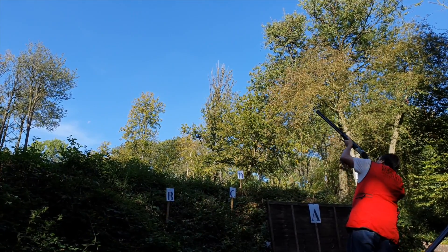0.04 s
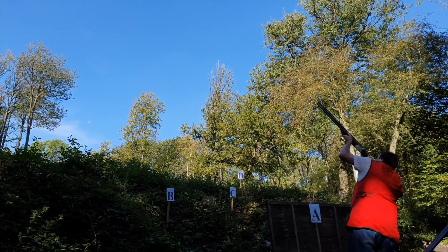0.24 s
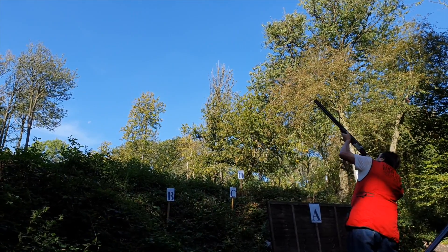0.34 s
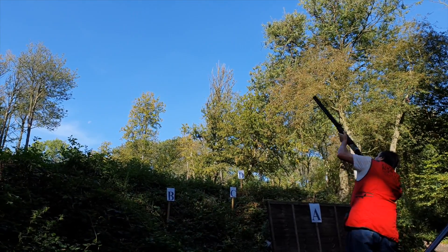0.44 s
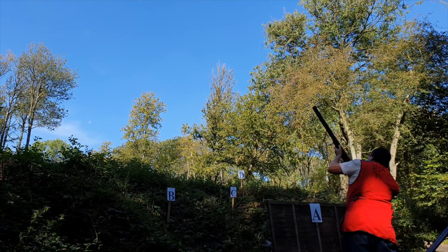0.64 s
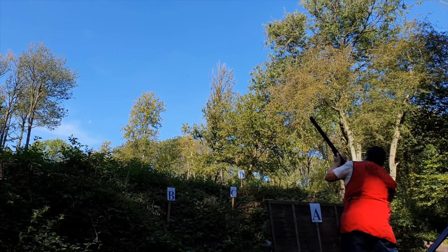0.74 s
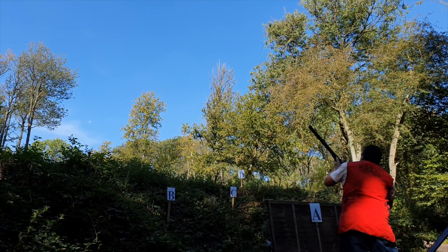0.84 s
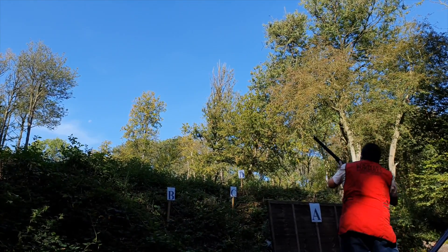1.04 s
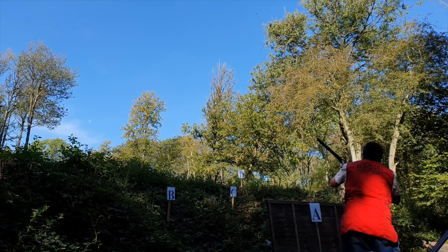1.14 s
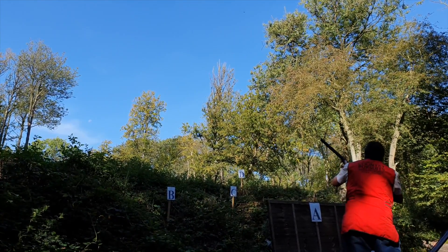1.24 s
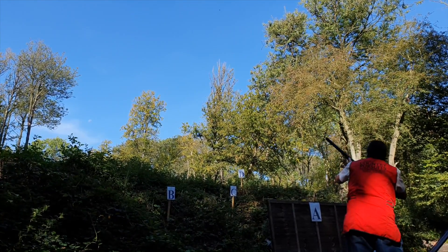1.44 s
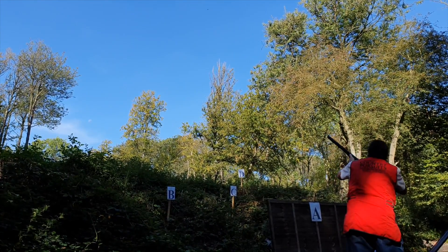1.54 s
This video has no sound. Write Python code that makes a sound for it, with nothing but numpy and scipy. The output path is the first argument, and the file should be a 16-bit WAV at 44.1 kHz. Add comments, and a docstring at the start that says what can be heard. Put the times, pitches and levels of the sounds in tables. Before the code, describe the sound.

A single shotgun blast cracks close by and rolls away through the surrounding woods.

```python
"""First comes a low outdoor rumble and a small click, then one shotgun shot from a few metres ahead.
Gas from the muzzle makes a short, harsh crack, and its pressure wave bounces off the ground.
A bank and near trees around the shooting ground throw it back as a bright swell of echoes.
The far woods ring on, growing darker and rolling from left to right, with a faint rustle in the tail."""
import sys
import numpy as np
from scipy import signal
from scipy.fft import rfft, irfft
from scipy.io import wavfile

SR = 44100
rng = np.random.default_rng(int(sys.argv[2]) if len(sys.argv) > 2 else 0)


def put_to_file(sound):
    """Save the sound as 16-bit audio at rate SR, in the file named by the first command-line argument."""
    columns = np.atleast_2d(sound).T  # one column per channel
    safe = np.clip(columns, -1, 1)
    whole_steps = np.round(safe * 32767)
    wavfile.write(sys.argv[1], SR, whole_steps.astype(np.int16))


N = 70560  # 1.6 seconds
SHOT_S = .2343


def undb(db):
    """Turn decibels into a number to multiply by."""
    return 10 ** (np.asarray(db) / 20)


def rms(x):
    """The average strength of a sound."""
    return np.sqrt(np.mean(x ** 2))


def unit(x):
    return x / rms(x)


def clock():
    return np.arange(N) / SR


def freqs():
    return np.arange(N + 1) * SR / (2 * N)


def at(hz, table, column=1):
    """Look up a table between its rows, on a log-frequency scale."""
    table = np.array(table)
    return np.interp(np.log(hz + 1), np.log(table[:, 0]), table[:, column])


def loudness(table):
    """A volume curve through (time [s], level [dB]) points."""
    return undb(np.interp(clock(), *np.array(table).T))


def bump(centre, width):
    """A smooth rise and fall."""
    return np.exp(-((clock() - centre) / width) ** 2 / 2)


def burst(start, hold, fall):
    """Jump to full strength, hold, then die away."""
    age = clock() - start
    return (age >= 0) * np.exp(-np.maximum(age - hold, 0) / fall)


def fade(age, fade_s):
    """Drop by 60 dB every fade_s seconds."""
    return np.exp(-np.log(1000) * age / fade_s)


def colour(x, table):
    """Shape the tone with (frequency [Hz], gain [dB]) points."""
    cepstrum = irfft(np.log(undb(at(freqs(), table))))
    cepstrum[1:N] *= 2  # folded so the filter rings only after a sound, never before
    cepstrum[N + 1:] = 0
    return irfft(rfft(x, 2 * N) * np.exp(rfft(cepstrum)))[..., :N]


def balance(x, table):
    """Tilt the two sides apart in tone by (frequency [Hz], left minus right [dB]) points."""
    return np.array([colour(side, np.array(table) * [1, half]) for side, half in zip(x, (.5, -.5))])


def arrive(x, lag_ms):
    """A wave reaches the left microphone lag_ms after the right; below zero, the left comes first."""
    delay_s = np.array([[lag_ms], [-lag_ms]]) / 2000
    return irfft(rfft(x, 2 * N) * np.exp(-2j * np.pi * freqs() * delay_s))[:, :N]


def grains(scatter_db=1.5):
    """Noise like a crowd of tiny echoes of uneven size."""
    sizes_db = scatter_db * np.repeat(rng.standard_normal(N // 16 + 1), 16)[:N]
    return unit(rng.standard_normal(N) * undb(sizes_db))


def surround(tone, lag_ms=0, focus=0, mic_gap_ms=.48, bass_likeness=.94):
    """Noise from all around, alike on both sides in the bass; the focus share comes from one direction."""
    hz, angles = freqs()[::100], np.linspace(0, np.pi, 64)
    alike = np.cos(2 * np.pi * np.outer(hz, np.cos(angles)) * mic_gap_ms / 1000).mean(1)
    alike = np.interp(freqs(), hz, alike) * bass_likeness
    mid = grains()
    side = irfft(rfft(grains(), 2 * N) * np.sqrt((1 - alike) / (1 + alike)))[:N]
    around = np.array([mid + side, mid - side]) / np.sqrt(2)
    aimed = arrive(grains(), lag_ms)
    return unit(colour(np.sqrt(1 - focus) * around + np.sqrt(focus) * aimed, tone))


# Tone of the rumble (frequency [Hz], relative level [dB])
RUMBLE_TONE = [(20, -24), (40, -7.5), (75, 1), (140, -11.5), (220, -10), (350, -17.5), (600, -16),
               (1000, -24.5), (1500, -31.5), (2400, -42), (4000, -44.5), (6000, -41), (7000, -51.5),
               (10000, -52), (12000, -62), (16000, -66)]
# How loud the rumble is (time [s], level [dB])
RUMBLE_LEVEL = [(0, -45), (.22, -47.5), (.3, -53.5), (.8, -61.5), (1.3, -65.5), (1.6, -63)]

def rumble():
    """Low outdoor rumble, much quieter after the shot."""
    return surround(RUMBLE_TONE) * loudness(RUMBLE_LEVEL)


# Tone of the click (frequency [Hz], relative level [dB])
CLICK_TONE = [(200, -13), (900, -4.5), (1500, 5.5), (2600, -14), (7000, -18), (12000, -13), (16000, -18)]
# Notes of its knock (frequency [Hz], peak level [dB], time to fade 60 dB [s])
KNOCK_NOTES = [(1260, -44.5, .025), (1690, -45.5, 0.02)]

def click(start_s=.154):
    """A tick of noise and two briefly ringing notes, just before the shot."""
    age = np.maximum(clock() - start_s, 0)
    knock = sum(undb(db) * np.sin(2 * np.pi * hz * age) * fade(age, fade_s)
                for hz, db, fade_s in KNOCK_NOTES)
    tick = surround(CLICK_TONE) * burst(start_s, hold=0, fall=.0022) * undb(-47)
    return knock + tick


# Tone of the crack (frequency [Hz], relative level [dB])
CRACK_TONE = [(60, -19.5), (200, -6.5), (290, 4.5), (430, -12), (660, -1.5), (950, -6.5), (1500, -8.5),
              (2200, -16.5), (3300, -11), (4000, -3.5), (4900, 0.5), (5800, -8), (7000, -19), (8500, -9.5),
              (11000, -23), (16000, -22)]
# Which way the crack leans (frequency [Hz], left minus right [dB])
CRACK_LEAN = [(100, 4), (700, 6.5), (2500, 3.5), (4800, 6.5), (7000, 0), (9000, -1.5), (16000, -1)]

def muzzle_crack():
    """Gas leaves the muzzle in a few milliseconds of harsh noise, with an edge near 5 kHz on the left."""
    gas = arrive(rng.standard_normal(N), lag_ms=.093)
    gas += .6 * rng.standard_normal((2, N))  # separate noise on each side widens the sound
    shape = burst(SHOT_S, hold=.0017, fall=.003)
    crack = colour(balance(gas * shape, CRACK_LEAN), CRACK_TONE)
    return unit(crack) * rms(shape) * undb(-11)


# The muzzle's wave, its ground bounce, then slaps off the bank and trunks
# (time [s], level before tone shaping [dB], push length [ms], left lag [ms], left minus right [dB])
SHOCKS = [(.2352, -11.5, .5, 0.1, 7), (.2382, -2, .7, .05, 5), (.2760, -17.5, .6, -0.17, -2.5),
          (.2790, -19.5, .6, -.2, 0), (.2955, -11.5, 0.44, -.2, -1.5), (.3030, -12.5, .3, -.23, -1),
          (.3075, -11, 0.4, -0.34, 0), (.3105, -11, 0.36, -.23, -1)]
# Tone of these waves (frequency [Hz], gain [dB])
SHOCK_TONE = [(40, -21.5), (120, -13.5), (280, 0.5), (480, -6), (720, 5.5), (1150, 0), (1700, 1),
              (2400, -5.5), (5000, -11), (16000, -15.5)]

def shock_waves(puff_s=.257, puff_hz=72.2):
    """Each wave pushes the air, then sucks it back; a slow, deep puff of air follows the shot."""
    waves = 0
    for start, db, push_ms, lag_ms, lean_db in SHOCKS:
        age = np.maximum(clock() - start, 0) * 1000 / push_ms  # counted in push lengths
        wave = (age > 0) * (1 - age) * np.exp(-age)
        sides = undb([[lean_db / 2], [-lean_db / 2]])
        waves += arrive(wave, lag_ms) * undb(db) * sides
    puff = -np.sin(2 * np.pi * puff_hz * (clock() - puff_s)) * bump(puff_s, width=.0051)
    return colour(waves, SHOCK_TONE) + puff * undb(-25.5)


# Tone of the near echoes (frequency [Hz], relative level [dB])
NEAR_TONE = [(30, -32), (70, -11), (190, -11), (300, -7), (480, -8), (750, -6), (1200, -11), (1800, -6),
             (2300, -8), (3300, -8), (4100, -7.5), (5600, -8.5), (6900, -14), (8600, -13.5), (11000, -15.5),
             (13400, -19.5), (16000, -23)]
# How they swell and sink, before the closing fade (time [s], level [dB])
NEAR_SWELL = [(.236, -33), (.246, -25), (.258, -19.5), (.268, -19.5), (.277, -15.5), (.291, -15.5),
              (.305, -15.5), (.315, -16), (.335, -22), (.38, -29.5), (.5, -84)]

def near_trees():
    """Bank, trunks and leaves throw the blast back as a bright swell."""
    echoes = surround(NEAR_TONE, lag_ms=-.23, focus=.16)
    return echoes * loudness(NEAR_SWELL) * burst(SHOT_S, hold=.25, fall=.03)


# Tone of the far echoes (frequency [Hz], relative level [dB])
WOODS_TONE = [(24, -50.5), (40, -22.5), (77, -11), (194, -15), (231, -9.5), (402, -8), (585, -3.5),
              (697, -8), (873, -6.5), (1340, -6), (1810, -6), (2150, -9), (3060, -7), (4240, -12),
              (6020, -10), (6820, -19.5), (13100, -25), (14800, -36), (16000, -51.5)]
# How they die away (frequency [Hz], early 60 dB fade [s], late 60 dB fade [s], late share [dB])
WOODS_FADES = [(60, 0.63, 1.52, -14), (254, 0.56, 1.8, -8.5), (616, .55, 1.57, -6), (1300, 0.35, 1.54, -8),
               (3080, 0.63, 1.133, -5.5), (5950, 0.79, 0.75, 0), (8060, 0.8, 0.68, -4),
               (13900, 0.29, 0.37, -16)]

def far_woods(full_s=.34, hold_s=.071, roll_s=.23, edge_s=1, thinning_db_per_s=7.5):
    """The far trees ring on, losing their high notes first; the echo rolls from left to right."""
    t = clock()
    age = np.maximum(t - full_s - hold_s, 0)
    left_share = np.exp(-(age / roll_s) ** 2)
    from_left = np.sqrt(left_share) * surround(WOODS_TONE, lag_ms=-.36, focus=.2)
    from_right = np.sqrt(1 - left_share) * surround(WOODS_TONE, lag_ms=.466, focus=.13)
    spectrum = rfft(from_left + from_right, 2 * N)
    centres = np.geomspace(50, 16000, 18)
    tail = 0
    for hz, pick in zip(centres, np.eye(len(centres))):  # each band fades at its own speed
        band = irfft(spectrum * at(freqs(), np.c_[centres, pick]))[:, :N]
        early_s, late_s, late_db = (at(hz, WOODS_FADES, column) for column in (1, 2, 3))
        late_share = undb(late_db)
        tail += band * ((1 - late_share) * fade(age, early_s) + late_share * fade(age, late_s))
    rise = np.where(t < full_s, bump(full_s, width=.049), 1) * (t > SHOT_S)
    # past the far edge of the wood the echoes thin out faster
    thinning_db = thinning_db_per_s * np.maximum(t - edge_s, 0)
    return tail * rise * undb(-22.5 - thinning_db)


# Echoes from clumps of trees (time [s], width [s], pitch [Hz], pitch spread [Hz], level [dB])
CLUMP_ECHOES = [(.281, 0.004, 4100, 1500, -28.5), (.296, 0.0031, 402, 300, -22.5),
                (0.304, 0.003, 852.3, 277, -14.5), (0.303, 0.007, 4030, 601.5, -19.5),
                (0.307, 0.0033, 1825, 260, -14), (0.437, 0.0088, 601, 220, -29),
                (.445, 0.021, 3000, 2500, -31.5)]

def tree_clumps():
    """Groups of trunks each return a short echo with a pitch of its own."""
    echoes = 0
    for centre, width, hz, spread_hz, db in CLUMP_ECHOES:
        shape = bump(centre, width)
        band = np.exp(-2 * ((freqs() - hz) / spread_hz) ** 2)
        noise = irfft(rfft(rng.standard_normal(N), 2 * N) * band)[:N]
        echoes += unit(noise * shape) * rms(shape) * undb(db)
    return arrive(echoes, lag_ms=-.25)


# Tone of the rustle (frequency [Hz], relative level [dB])
RUSTLE_TONE = [(2000, -27), (6000, -20), (9500, 16), (12000, -3), (16000, 3)]

def rustle():
    """A faint, high hiss comes and goes while the echoes fade."""
    return surround(RUSTLE_TONE) * bump(centre=.924, width=.048) * undb(-76)


def scene():
    """Add up all the sounds."""
    return (rumble() + click() + muzzle_crack() + shock_waves()
            + near_trees() + far_woods() + tree_clumps() + rustle())


# How the two microphones differ in tone (frequency [Hz], left minus right [dB])
MIC_LEAN = [(60, -1), (200, -.5), (600, .3), (1300, 0), (2400, .8), (4400, 2.5), (6500, 0), (8500, -1.5),
            (16000, -1.2)]

def record(dry, low_cut_hz=36, top_hz=15900):
    """The microphones tint each side; the recorder drops deep bass, clips peaks and cuts the top."""
    bass_cut = signal.butter(2, low_cut_hz, "high", fs=SR, output="sos")
    top_cut = signal.ellip(10, .2, 80, top_hz, fs=SR, output="sos")
    thinned = signal.sosfilt(bass_cut, balance(dry, MIC_LEAN))
    return signal.sosfilt(top_cut, np.clip(thinned, -1, 1))


dry = scene()
out = record(dry)
put_to_file(out)
```